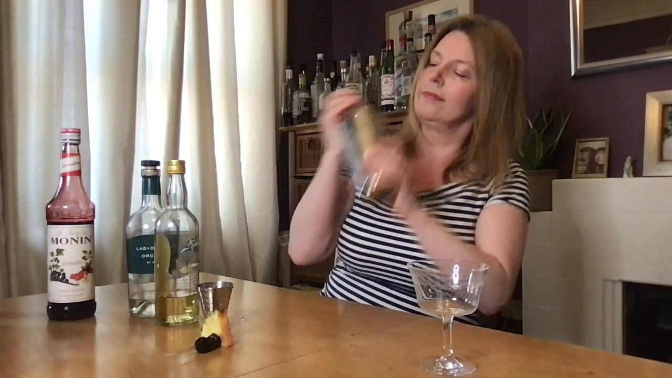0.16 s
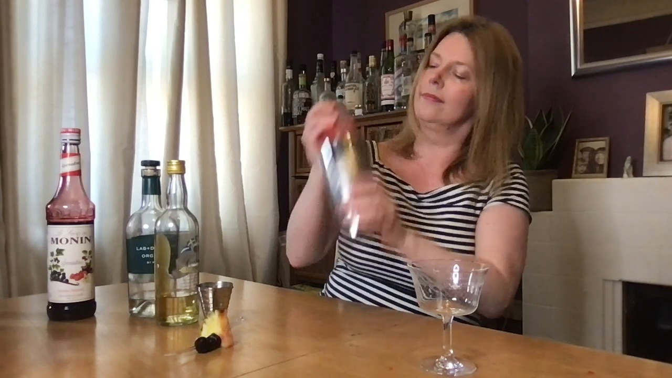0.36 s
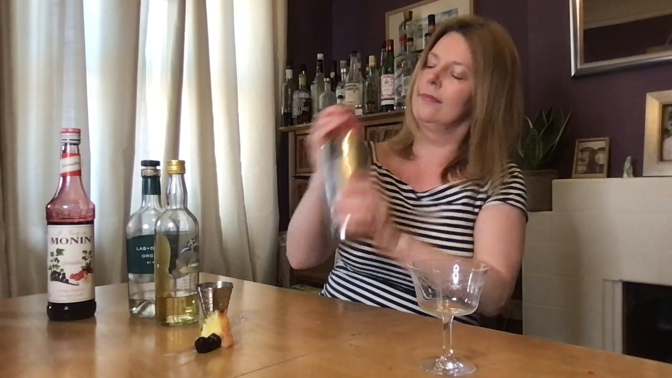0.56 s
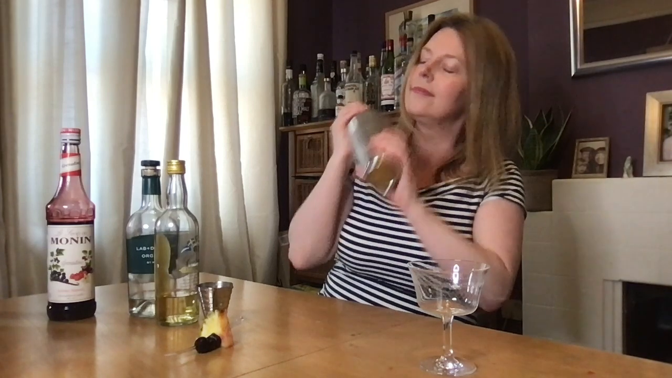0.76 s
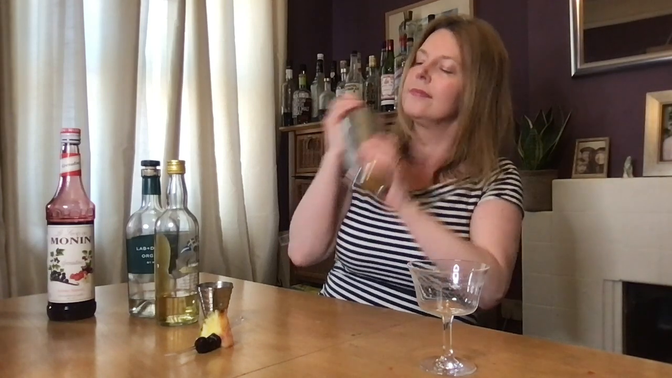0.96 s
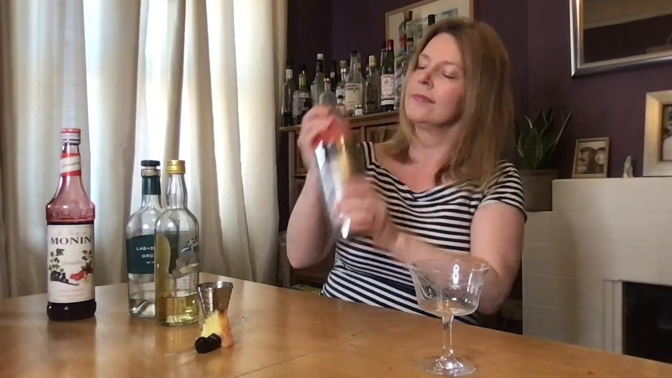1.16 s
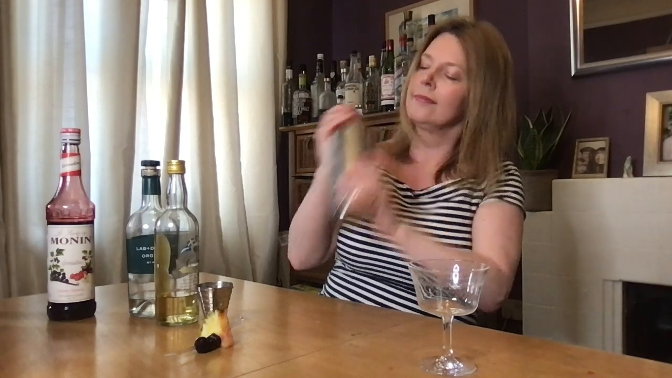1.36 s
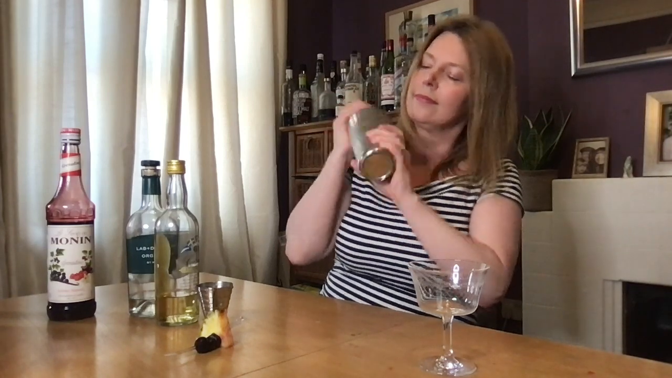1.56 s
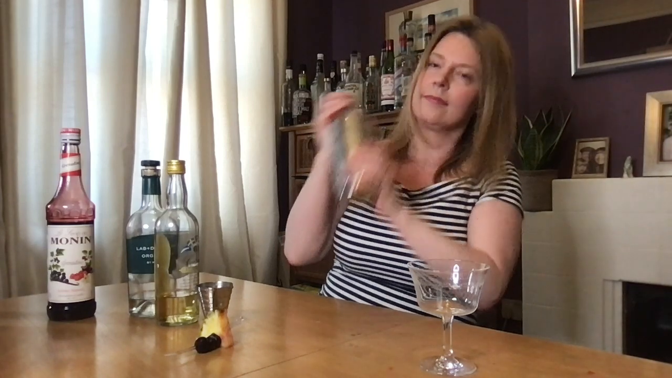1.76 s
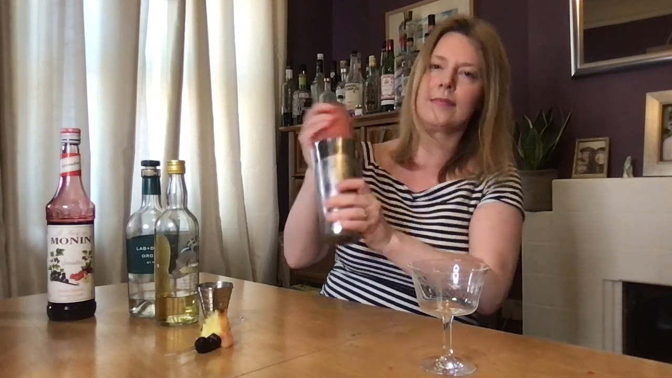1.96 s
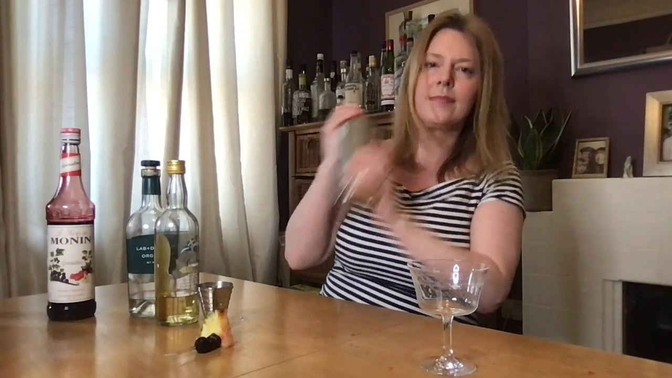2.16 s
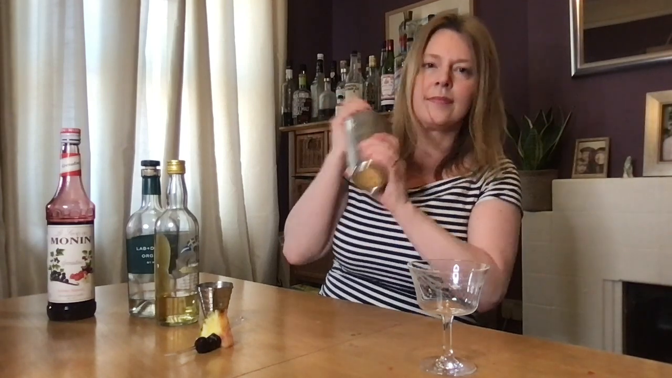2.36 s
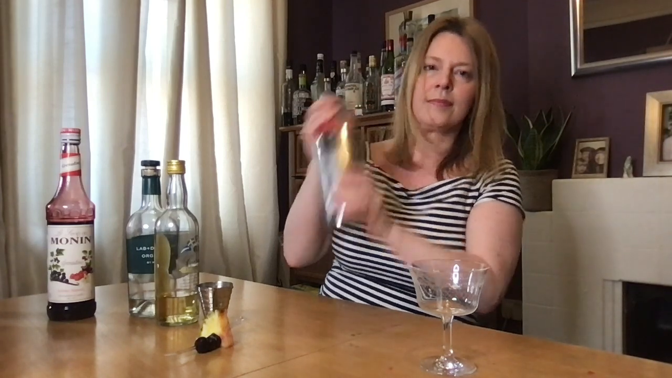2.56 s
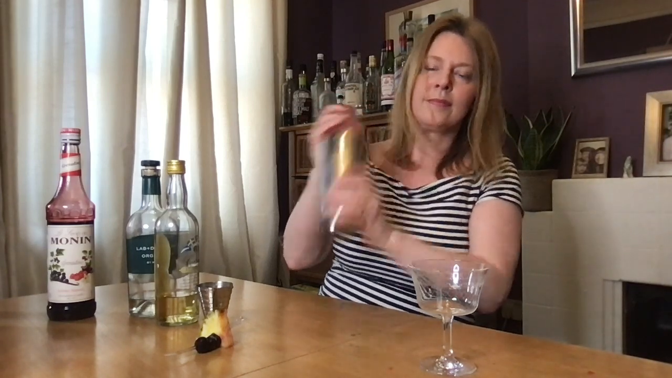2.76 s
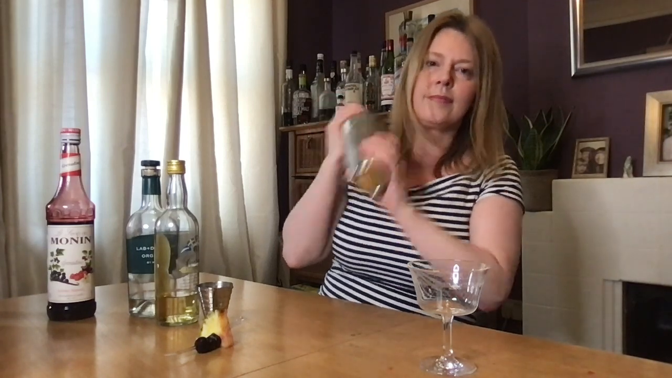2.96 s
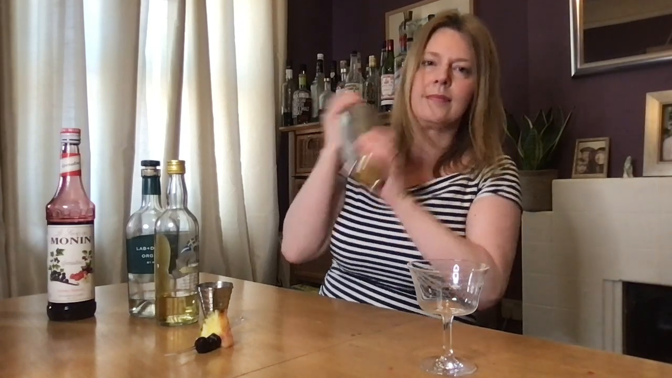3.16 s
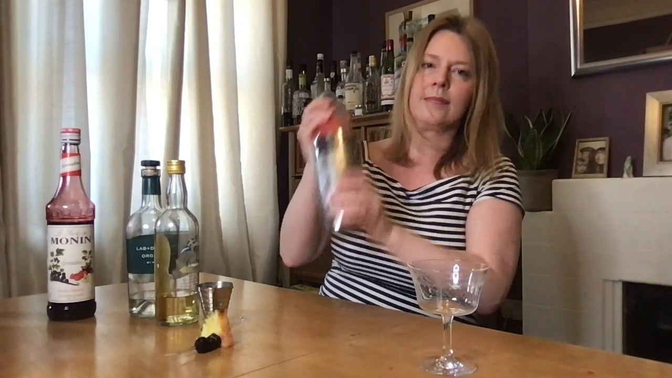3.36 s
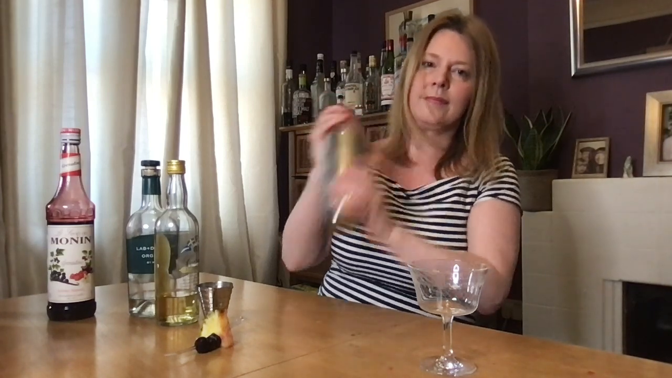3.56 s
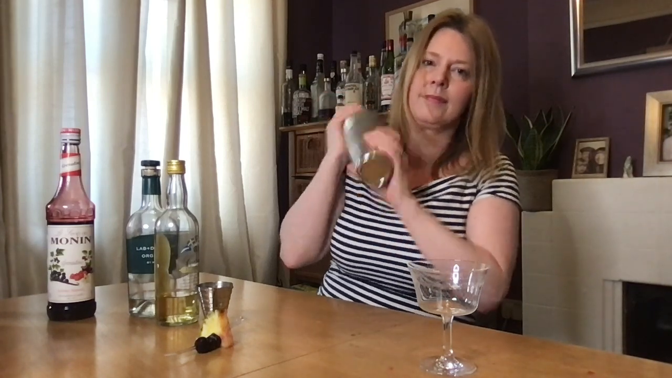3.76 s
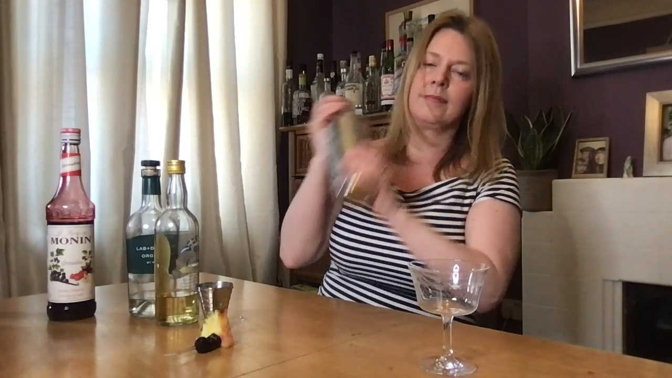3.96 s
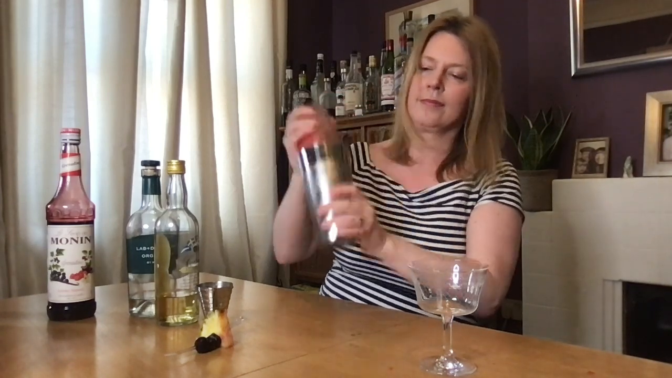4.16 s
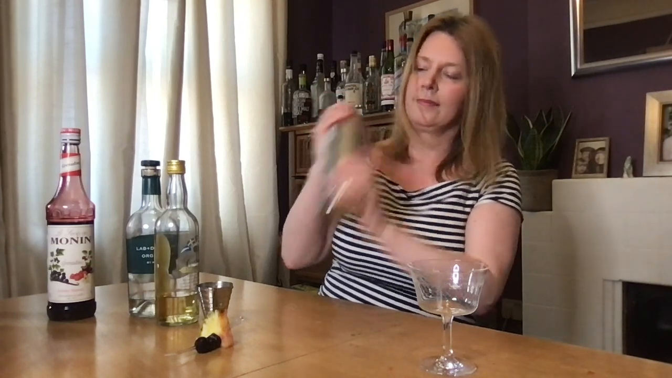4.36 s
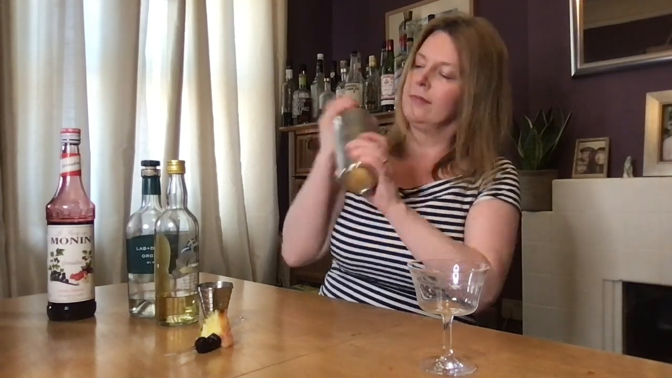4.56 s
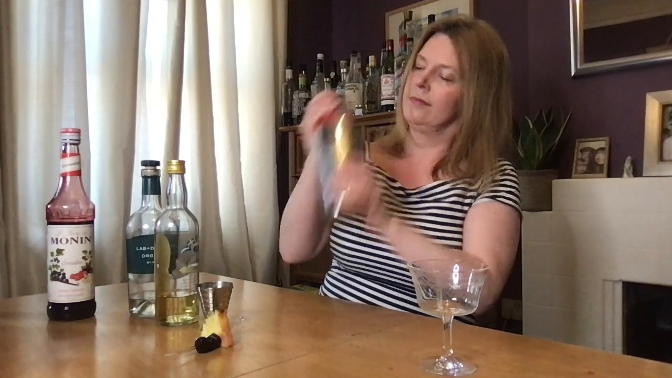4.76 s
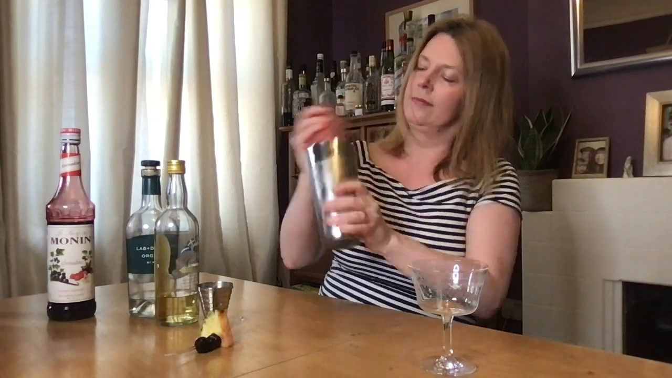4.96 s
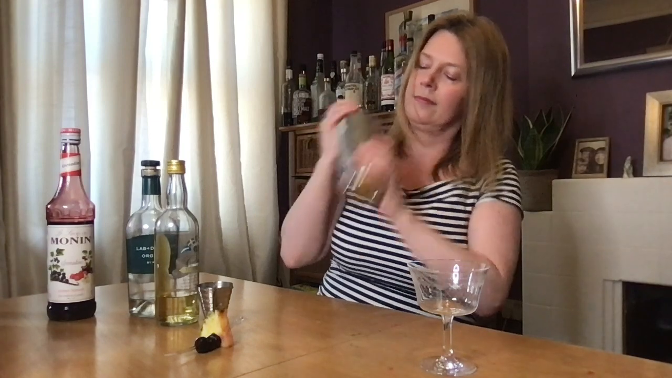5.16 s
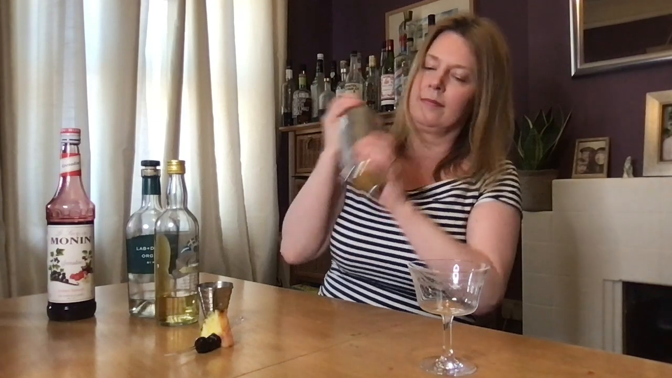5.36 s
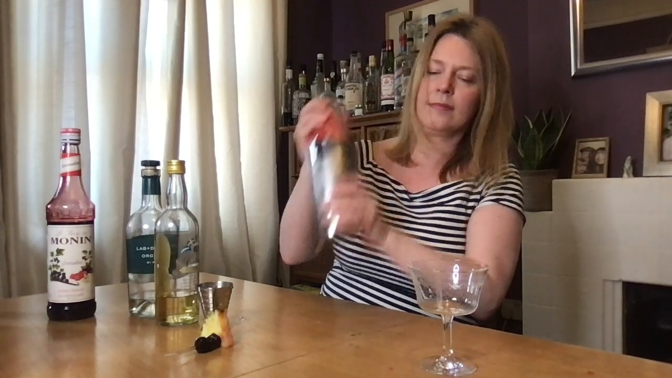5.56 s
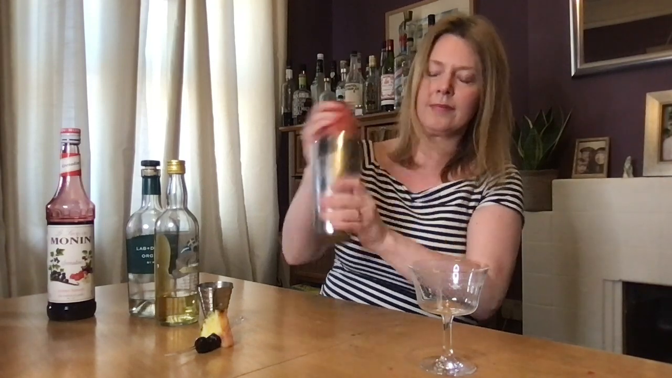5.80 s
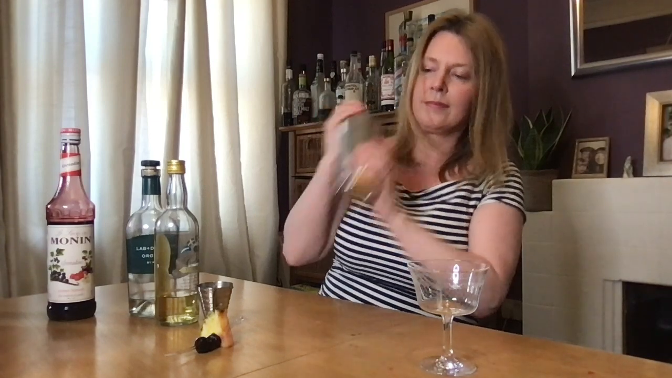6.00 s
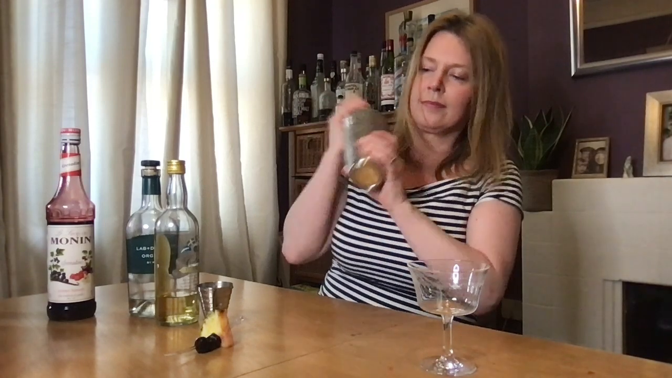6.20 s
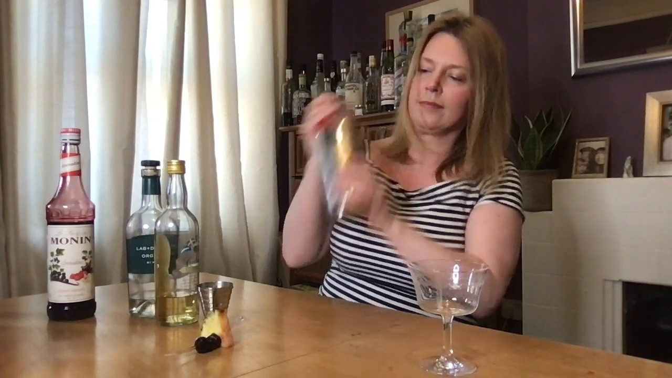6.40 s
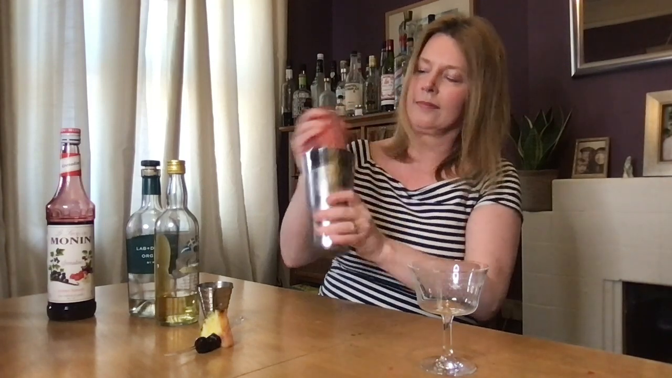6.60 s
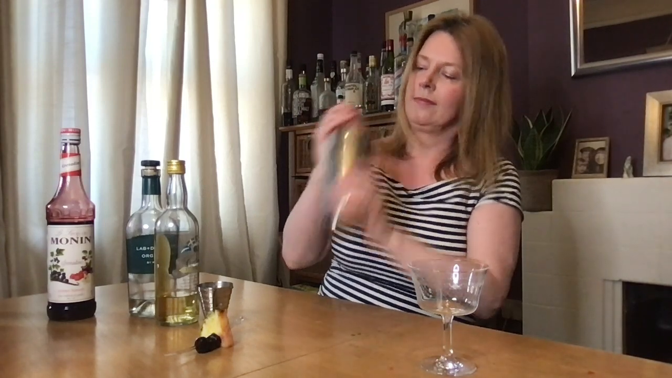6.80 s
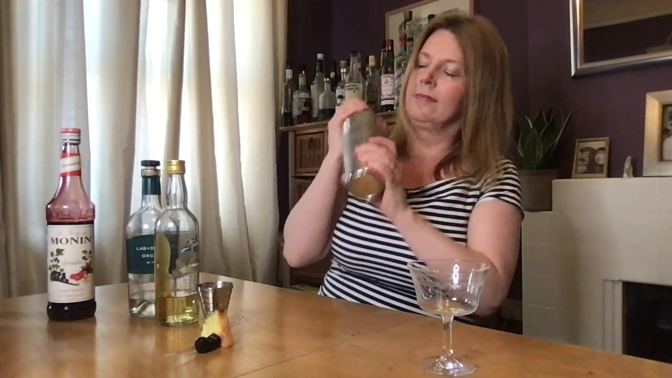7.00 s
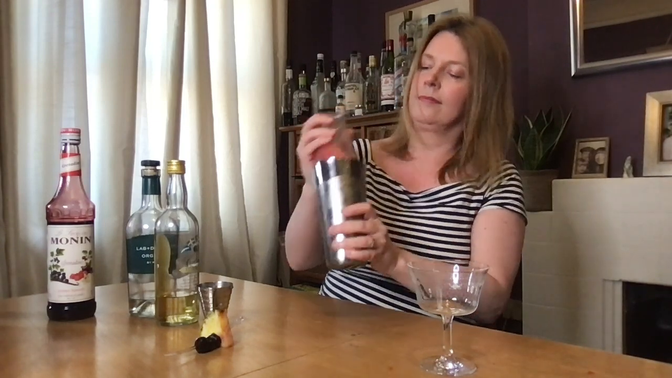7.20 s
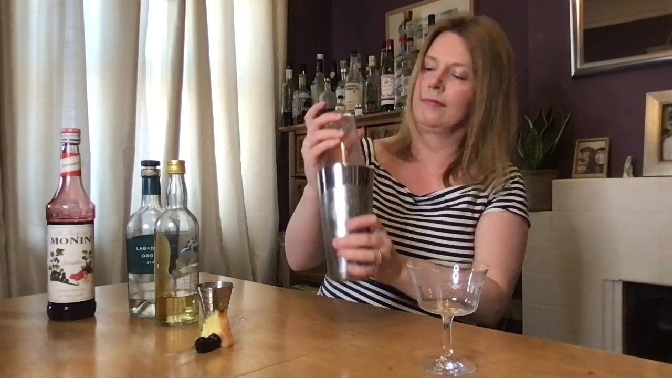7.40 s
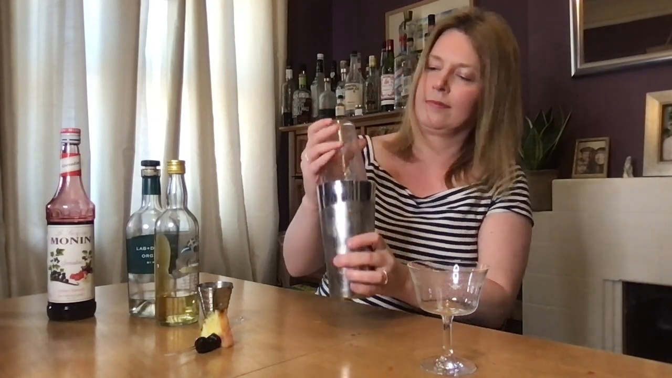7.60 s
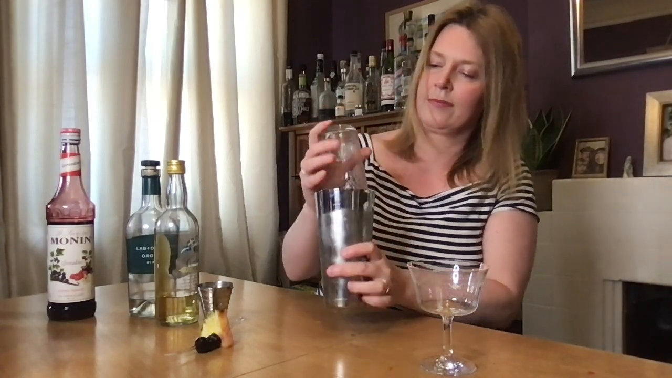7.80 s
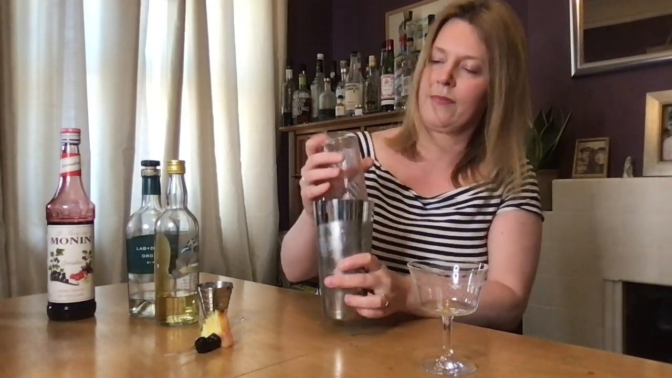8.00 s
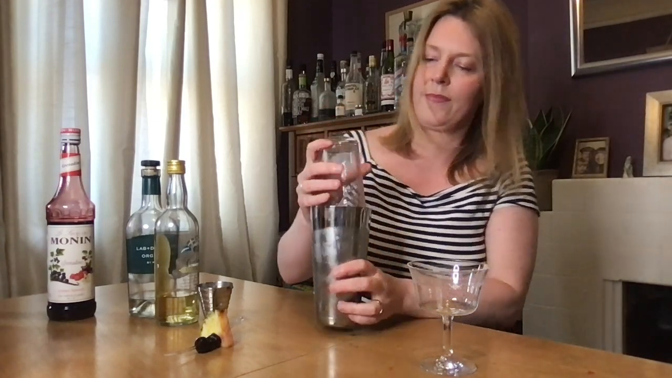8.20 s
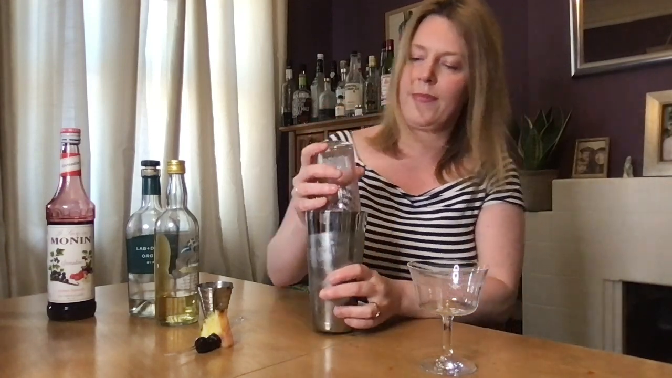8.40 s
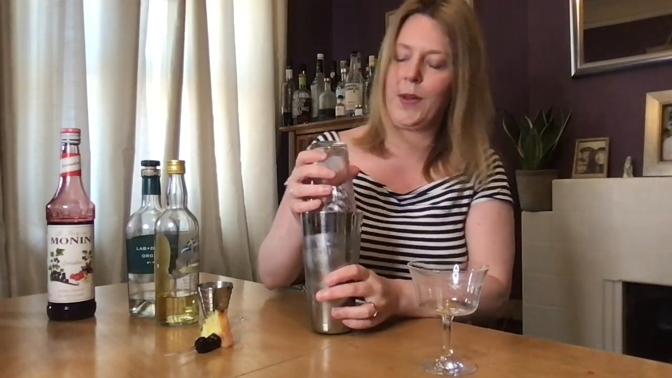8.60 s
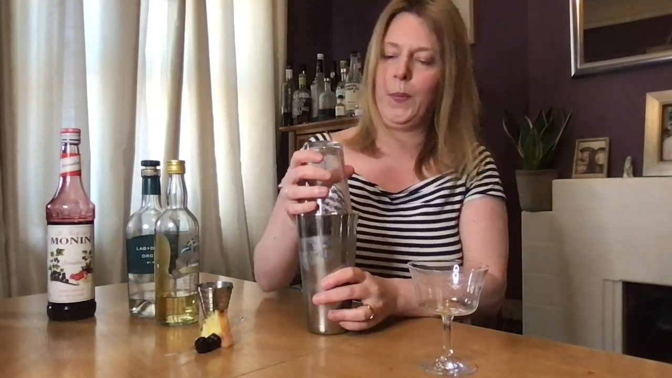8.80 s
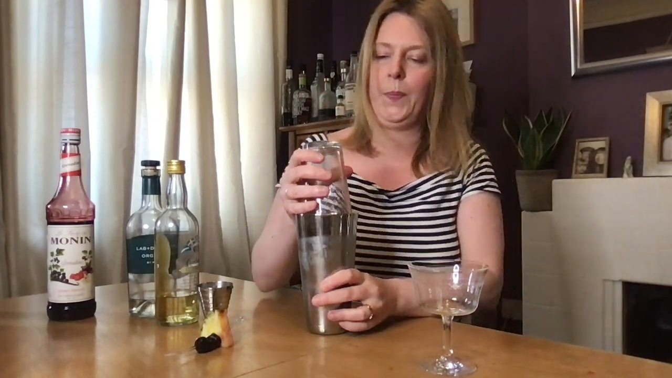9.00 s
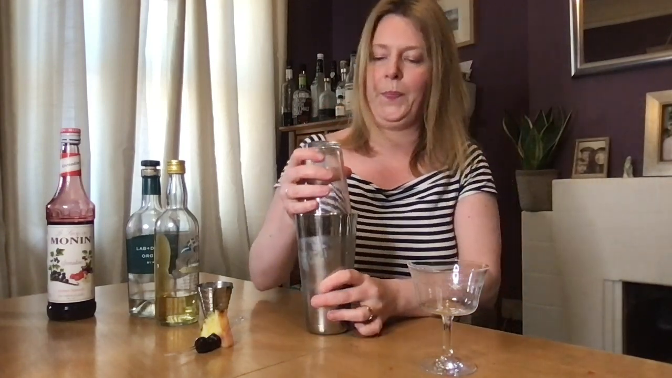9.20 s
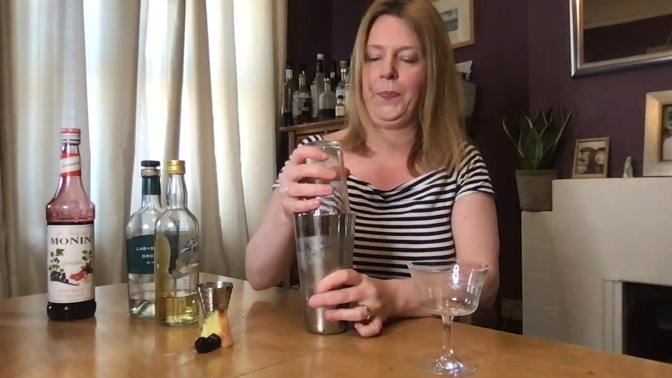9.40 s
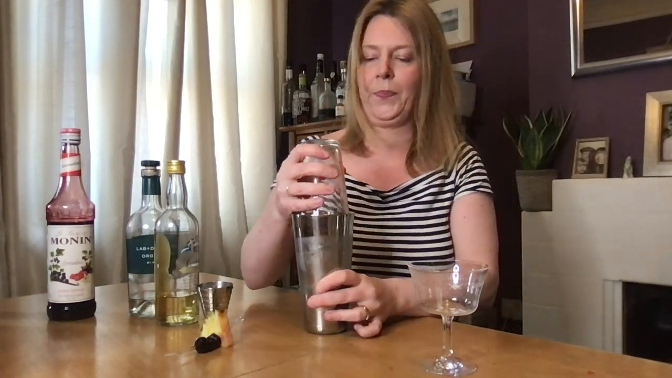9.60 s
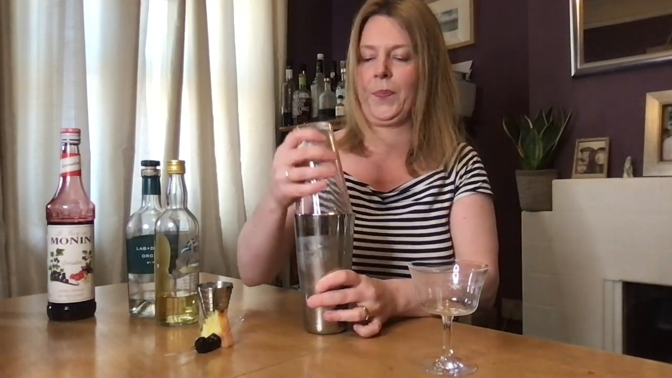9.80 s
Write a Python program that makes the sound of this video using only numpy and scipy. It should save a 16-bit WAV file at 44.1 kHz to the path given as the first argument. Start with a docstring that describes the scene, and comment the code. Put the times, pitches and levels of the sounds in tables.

```python
"""Sharp cracks, short metallic rings and icy clatter, then soft knocks, a squeak and a faint glassy ring.
Ice cubes and liquor are shaken in a steel tin capped with a mixing glass, in a furnished room: cubes are
noise bursts and damped tones, the tin a set of struck modes, small ice a stream of pings over a wash.
The shaking stops; the tin is set on a wooden table (struck modes) and rocked, and the glass is worked
loose (gliding tones, grains of friction, rim modes). Room tone and a low rumble lie underneath."""
import sys
import numpy as np
from scipy import signal
from scipy.io import wavfile

SR = 44100
rng = np.random.default_rng(int(sys.argv[2]) if len(sys.argv) > 2 else 0)


def master(y):
    """Save y as 16-bit WAV."""
    cut = np.clip(np.atleast_2d(y).T, -1, 1)
    pcm = np.round(cut * 32767)  # scale
    wavfile.write(sys.argv[1], SR, pcm.astype(np.int16))


N = 434385

# Cubes cracking on the wall. Each row: time in seconds, relative level in dB, thud in dB and
# splinter in dB relative to the body, body pitch in Hz.
CRACKS = [(0.0225, -29.5, -26.5, -4, 4000), (0.186, -26, -9, -43, 3810), (0.292, -30.5, -38, -23.5, 2620),
          (0.394, -30, -6, -5, 2850), (0.5339, -28.5, -5, -3, 2160), (0.6743, -37, 3, 5, 1940),
          (0.7175, -15, -19.5, -17.5, 1960), (0.833, -28.5, -9, -3, 2490), (0.876, -36.5, 2, -12, 3020),
          (0.935, -29.5, 3, -25, 3000), (0.991, -26, -37, -16, 2080), (1.0666, -20, -11.5, -16, 2370),
          (1.108, -25.5, -26, -18, 3620), (1.177, -32.5, -36, -3, 3930), (1.2383, -29.5, 0.5, -5.5, 3740),
          (1.4149, -22, -54, -9, 3770), (1.5326, -21.5, -11, -8, 1880), (1.6854, -17.5, -42, -19.5, 3500),
          (1.7916, -23, -19, -38, 2190), (1.9055, -22, -10.5, -6, 1920), (1.9642, -20, -98, -45.5, 4840),
          (2.1111, -32, -0.5, -38, 4000), (2.157, -27.5, -25, -15.5, 2230),
          (2.244, -20.5, -16.5, -12.5, 3530), (2.311, -26.5, -2.5, -5, 3120),
          (2.602, -27, -10.5, -7.5, 1920), (2.745, -26, -11, -9, 3700), (2.834, -28.5, -1, 3.5, 2540),
          (3.0038, -23.5, -6.5, -19.5, 1770), (3.0741, -27, -17, -7, 2010), (3.1564, -24, -9, -30, 1980),
          (3.3152, -28, -5.5, -28, 3340), (3.4113, -32, 5, -18, 3650), (3.541, -24, -28, -18.5, 2700),
          (3.602, -19.5, -71.5, -15, 3730), (3.7073, -30, 2.5, -6, 3600), (3.84, -28, -4, -8, 3020),
          (3.947, -23.5, -11.5, -25, 1940), (4.194, -24, -34, -27, 4650), (4.2386, -30.5, 3, -2.5, 3220),
          (4.277, -23.5, -25, -33, 1880), (4.398, -37, -1.5, 5.5, 4770), (4.6215, -21.5, -32, -14.5, 3640),
          (4.82, -32.5, 6.5, -6, 3040), (4.888, -22, -32, -36, 1760), (4.9642, -26, -19, -13, 2200),
          (5.0938, -22.5, -8, -12.5, 1980), (5.1792, -29.5, -14, -30, 1870),
          (5.222, -27.5, -10, -7.5, 2290), (5.2938, -25.5, -10.5, -15.5, 2550),
          (5.4311, -39, -10, -2.5, 3900), (5.492, -23.5, -22, -12, 2500), (5.607, -26.5, -13, -12.5, 3190),
          (5.646, -14.5, -25, -27.5, 2200), (5.8517, -22, -77, -8.5, 4500), (6.015, -29.5, -10, -3, 4060),
          (6.2933, -26.5, -14, -4.5, 2420), (6.355, -28, -37, -4, 2440), (6.63, -25.5, -20, -13, 2490),
          (6.6816, -32.5, -16.5, -32, 3070), (6.79, -36.5, -1, -1, 3600), (6.8954, -21.5, -51, -9.5, 3590),
          (7.0224, -31, -11, -5, 1960), (7.1431, -25, -29, -17, 2330), (7.191, -35, -43.5, -12, 3180),
          (7.4213, -43, -7.5, -10, 3780), (7.5186, -39, -8.5, -15, 3310), (7.5817, -53, -40, 2, 3800),
          (7.779, -49, -5, -30, 2050)]
# Decay of the crack noise. Each row: frequency in Hz, T60 in seconds.
CRACK_T60 = [(200, 0.18), (1000, 0.19), (4000, 0.25), (14000, 0.1)]
THUD_HZ, SPLINTER_HZ = 550, 9000
BODY_RING_DB, BODY_RING_T60_S = -24, 0.13
BODY_SPREAD = 0.07   # log-frequency spread of a cube's tones

# Cubes landing flat, ringing the tin. Each row: time in seconds, relative level in dB,
# free ring in seconds before liquor stifles it.
CLANGS = [(0.1657, -32.5, 0.033), (0.2283, -30, 0.028), (0.4205, -20, 0.02), (0.448, -31.5, 0.014),
          (0.4829, -19, 0.016), (0.6, -33, 0.042), (0.675, -25, 0.014), (0.7168, -19, 0.0047),
          (1.1243, -29, 0.026), (1.255, -19.5, 0.0064), (1.7773, -18, 0.0025), (1.789, -24.5, 0.0084),
          (2.08, -23.5, 0.0039), (2.319, -25.5, 0.009), (2.612, -27.5, 0.0088), (2.6606, -23.5, 0.011),
          (2.8628, -30, 0.02), (2.876, -29.5, 0.023), (3.135, -32, 0.044), (3.1825, -25.5, 0.017),
          (3.412, -25.5, 0.0065), (3.709, -25, 0.0062), (3.84, -32, 0.0114), (3.9448, -36, 0.0091),
          (3.986, -31.5, 0.025), (4.241, -25.5, 0.018), (4.5104, -33.5, 0.06), (4.687, -34, 0.034),
          (4.8207, -25, 0.011), (5.0496, -26.5, 0.0055), (5.0769, -23, 0.0047), (5.133, -35, 0.022),
          (5.3336, -31.5, 0.032), (5.608, -24, 0.022), (5.644, -18, 0.0042), (5.685, -30, 0.016),
          (5.8933, -28, 0.016), (6.1805, -26.5, 0.042), (6.201, -27, 0.015), (6.293, -28, 0.0074),
          (6.434, -23, 0.021), (6.445, -24.5, 0.029), (6.6833, -26.5, 0.022), (6.714, -35, 0.014),
          (6.974, -23, 0.0056), (7.1896, -21, 0.01), (7.2684, -22.5, 0.0069), (7.478, -42, 0.019),
          (7.7804, -49, 0.0035), (8.256, -60, 0.008)]
# Tin modes. Each row: nominal frequency in Hz, relative level in dB, T60 in seconds when struck.
TIN_MODES = [(1668, 2.5, 0.35), (1790, -16.5, 0.093), (1880, -12, 0.058), (1600, -16, 0.051),
             (1636, -14, 0.07), (3190, -20, 0.11)]
BLOOM_S, CHOKE_TAKES_S, CHOKE_DB = 0.0042, 0.0021, -10.5   # liquor falls back on the wall
STIFLED_DB_PER_S = 380   # extra loss under liquor
CLANG_DETUNE = .006   # fractional spread; grip and liquor shift the ring from blow to blow

# Turns of the wrist throwing the small ice to the far end. Each row: start in seconds,
# relative level in dB before the sag, tumble length in seconds.
THROWS = [(-0.03, -41, 0.088), (.06, -38, 0.15), (.27, -40, 0.068), (.385, -38.5, 0.52), (.675, -38, 0.064),
          (.82, -36, 0.2), (1.06, -39.5, 0.3), (1.4, -42, 0.26), (1.53, -38.5, 0.32), (1.75, -36, 0.083),
          (1.89, -39.5, 0.17), (2.08, -37.5, 0.21), (2.24, -45, 0.12), (2.42, -37, 0.25),
          (2.6, -36.5, 0.071), (2.83, -35, 0.078), (2.99, -39.5, 0.19), (3.12, -36, .07),
          (3.29, -37, 0.038), (3.39, -38.5, 0.11), (3.53, -39, 0.13), (3.7, -41.5, 0.24),
          (3.93, -38.5, 0.051), (4.07, -33, 0.013), (4.19, -45, 0.17), (4.39, -40.5, 0.2),
          (4.5, -30.5, 0.035), (4.61, -41.5, 0.18), (4.805, -41, 0.22), (5.04, -38, 0.092),
          (5.17, -41.5, 0.2), (5.46, -41, 0.11), (5.6, -36.5, 0.28), (5.8, -38, .05), (5.86, -30.5, 0.032),
          (5.99, -34.5, 0.041), (6.09, -38.5, 0.017), (6.15, -38.5, 0.2), (6.28, -38.5, 0.13),
          (6.425, -36, 0.064), (6.57, -36, 0.14), (6.78, -43, 0.069), (6.88, -44.5, 0.11),
          (7.0, -40.5, 0.099), (7.14, -44, 0.16), (7.3, -45, 0.039), (7.5, -50.5, .07), (7.77, -71, .04),
          (7.85, -78, 0.67)]
THROW_RISE_S, TUMBLE_SAG_DB_PER_S, SETTLE_DB_PER_S = 0.018, 19, 167.5
# Colour of the clatter. Each row: frequency in Hz, relative level in dB.
CLATTER_COLOUR = [(71, -78.5), (120, -32.5), (427, -9), (800, -3), (1000, -1.5), (1260, -4.5), (1650, 4),
                  (2200, -1), (3900, 1.5), (5630, -3.5), (16000, -25.5)]
CHIP_CYCLES = 20   # periods in an ice chip's T60

# Chips ticking on bare steel. Each row: time in seconds, relative level in dB.
TICKS = [(0.4284, -24), (1.7513, -24), (2.8858, -28), (3.1288, -27), (3.652, -28.5), (4.52, -32),
         (4.8294, -22.5), (5.0133, -27), (5.071, -29), (5.5857, -29), (6.275, -29), (7.2396, -38),
         (7.345, -45), (7.3967, -44), (7.4779, -55), (7.5558, -56), (7.8128, -70), (8.1242, -70)]
TICK_T60_S, TICK_LOW_HZ, TICK_HIGH_HZ = .012, 2600.0, 9000.0

# Cubes landing softly on the wetted wall. Each row: time in seconds, relative level in dB.
THUMPS = [(0.5999, -45), (1.1233, -36.5), (1.7859, -32), (2.2029, -35), (2.5537, -40), (2.7768, -37.5),
          (2.8689, -34), (3.7198, -37), (5.8913, -33.5), (6.6987, -34.5), (8.255, -60)]
# Low modes of the tin under liquor. Each row: frequency in Hz, relative level in dB, T60 in seconds.
WETTED_WALL_MODES = [(929, 4, 0.058), (637.6, -6, 0.03), (745, -6, 0.17)]

# Soft bumps: two during the shaking, later the tin base on the table. Each row: time in seconds,
# relative level in dB, hardness (treble share) in dB, weight (bass share) in dB.
KNOCKS = [(3.71, -58, -13, -16), (4.819, -48, -27, -17), (8.432, -27.5, -27, 2), (8.79, -54, -48.5, 8),
          (8.907, -62.5, -46, 19), (9.083, -66, -43, 21), (9.216, -52.5, -29.5, 14.5),
          (9.682, -33.5, -24, -10)]
# Modes of table and tin base. Each row: frequency in Hz, relative level in dB,
# T60 in seconds when knocked.
TABLE_MODES = [(65.9, -8.5, 0.25), (130.5, -10, 0.3), (195.3, 0.5, 0.11), (244.5, -4.5, 0.073),
               (304, -7, 0.12), (346, -12, 0.121), (416.6, -8, 0.1), (600, -13, 0.056), (920, -7.5, 0.029),
               (1504, -7.5, 0.043), (3220, -7, 0.094), (5450, -1, 0.032)]
# Low murmurs: two dull ones during the shaking, later the tin base scuffing the table.
# Each row: start in seconds, level in dB before the sag, length in seconds.
MURMURS = [(3.72, -56, 0.1), (3.96, -59, 0.065), (8.785, -59, 0.039), (9.07, -76.5, 0.047),
           (9.21, -67, 0.24), (9.42, -67.5, 0.17), (9.58, -65.5, 0.18)]

# Short smooth tones: a low hum during the shaking, later the wet seal. Each row: start in seconds,
# length in seconds, first pitch in Hz, last pitch in Hz, peak level in dB.
SQUEAKS = [(3.805, 0.037, 151, 162, -48.5), (8.966, 0.048, 406, 490, -59.5), (9.162, .02, 1010, 1120, -70),
           (9.183, 0.019, 1590, 1710, -70), (9.583, 0.068, 277, 253, -61)]
# Hands rubbing and twisting the glass. Each row: start in seconds, level in dB before the sag,
# length in seconds.
RUBS = [(9.2, -74.5, 0.067), (9.38, -78, 0.14), (9.52, -69, 0.11)]
# Colour of the rubbing. Each row: frequency in Hz, relative level in dB.
RUB_COLOUR = [(410, -17.5), (700, 4.5), (1100, -10), (2000, -1), (2600, -6), (3700, 2.5), (4500, -23),
              (7000, -11.5), (9000, -32), (16000, -50)]
# The freed glass ringing. Each row: start in seconds, level in dB before the sag, length in seconds.
GLASS_RINGS = [(9.68, -69.5, 0.092)]
# Rim modes of the glass. Each row: frequency in Hz, relative level in dB, width in Hz (T60 = 1 / width).
RIM_MODES = [(1980, 3.5, 22), (4266, -2.5, 21), (7200, -1.5, 43)]

# Decay of the room. Each row: frequency in Hz, T60 in seconds.
ROOM_T60 = [(100, 0.26), (1000, 0.32), (8000, 0.41)]
ROOM_DB = -7.5
# Colour of the room tone. Each row: frequency in Hz, relative level in dB.
ROOM_TONE_COLOUR = [(15, -32), (25, 4.5), (99, -6.5), (157, -11.5), (249, -4.5), (545, -14.5), (2160, -21),
                    (2550, -25), (16000, -32.5)]
ROOM_TONE_DB = -80.5
# Distant rumble. Each row: time in seconds, level in dB.
RUMBLE = [(0, -78), (.68, -78.5), (1.2, -61.5), (2.1, -85.5), (2.96, -71.5), (3.89, -76), (5.68, -88.5),
          (7.0, -100.5), (8.4, -78.5), (9.85, -68)]
STOP_EDGE_HZ = 15900 * 1.03


def from_db(db):
    """Decibels to gain."""
    return 10 ** (np.asarray(db) / 20)


def rms_one(x):
    """Scale to rms 1."""
    return x / np.sqrt(np.mean(x ** 2) + 1e-20)


def in_time(rows, column):
    """One curve column in dB at every sample; -150 outside its span."""
    rows = np.array(rows)
    return np.interp(np.arange(N) / SR, rows[:, 0], rows[:, column], left=-150, right=-150)


def at_hz(points, hz):
    """A curve read on a log-frequency axis."""
    points = np.array(points)
    return np.interp(np.log(hz), np.log(points[:, 0]), points[:, 1])


def filtered(x, order, hz, kind="low"):
    """Butterworth filter."""
    return signal.sosfilt(signal.butter(order, hz, kind, fs=SR, output="sos"), x)


def train(times_s, sizes):
    """One-sample clicks of given sizes."""
    out = np.full(N, 1e-18)   # tiny floor keeps the filters fast
    at = np.round(np.array(times_s) * SR).astype(int)
    out[np.clip(at, 0, N - 1)] = sizes
    return out


def ring(clicks, hz, t60_s):
    """Two-pole resonator: a unit click starts a decaying sine of initial height near 1."""
    r = from_db(-60 / (t60_s * SR))
    w = 2 * np.pi * hz / SR
    return signal.lfilter([0, np.sin(w)], [1, -2 * r * np.cos(w), r * r], clicks)


def dying(clicks, t60_s):
    """Each click starts an envelope that falls 60 dB in t60_s."""
    decay = from_db(-60 / (max(t60_s, 1e-3) * SR))
    return signal.lfilter([1], [1, -decay], clicks)


def bands(lowest_hz):
    """Half-octave band filters with centres; alternating signs join neighbours without a notch."""
    edges_hz = lowest_hz * 2 ** np.arange(0, np.log2(17000 / lowest_hz), .5)
    for k, low_hz in enumerate(edges_hz):
        high_hz = min(low_hz * np.sqrt(2), .45 * SR)
        sos = signal.butter(2, [low_hz, high_hz], "band", fs=SR, output="sos")
        sos[0, :3] *= (-1) ** k
        yield low_hz * 2 ** .25, sos


def drift(rate_hz):
    """Slow chance: straight lines between normal random knots, at most 40 per second."""
    knots = rng.standard_normal(int(N / SR * 40) + 9)
    return np.interp(np.arange(N) * min(rate_hz, 40) / SR, np.arange(len(knots)), knots)


def grains(per_s, spread_db):
    """Random clicks of uneven size, the loudest capped; rms 1."""
    sizes = from_db(spread_db * np.minimum(rng.exponential(1, N), 3.5))
    signs = rng.choice([-1, 1], N)
    return rms_one(sizes * signs * (rng.random(N) < per_s / SR))


def coloured(x, spectrum, patchy_db=0):
    """A source through the band bank, each band optionally drifting in level; rms 1."""
    out = np.zeros(N)
    for hz, sos in bands(22):
        level_db = at_hz(spectrum, hz)
        if patchy_db:
            level_db = level_db + patchy_db * drift(25.0)
        out += from_db(level_db) * signal.sosfilt(sos, x)
    return rms_one(out)


def swells(rows, rise_s, sag_db_per_s, fall_db_per_s):
    """Level in dB of overlapping gestures: each rises 20 dB in rise_s, sags, then falls faster."""
    level_db = np.full(N // 32 + 2, -150.)
    t = np.arange(len(level_db)) * 32 / SR
    for start, db, length in rows:
        since = t - start
        rise_db = -20 * np.clip(1 - since / rise_s, 0, 9)
        sag_db = -sag_db_per_s * np.maximum(since, 0)
        fall_db = -fall_db_per_s * np.maximum(since - length, 0)
        level_db = np.maximum(level_db, db + rise_db + sag_db + fall_db)
    return np.interp(np.arange(N) / SR, t, level_db)


def cube_cracks():
    """A crack is a tick and a noise burst shaped around its body pitch; each band dies at its own rate."""
    rows = np.array(CRACKS)
    times_s, level_db, body_hz = rows[:, 0], rows[:, 1], rows[:, 4]
    chance = rng.normal(0, 1, (len(rows), 16))
    white = rng.standard_normal((2, N))
    out = np.zeros(N)
    for k, (hz, sos) in enumerate(bands(150)):
        zone_db = [np.interp(np.log(hz), np.log([THUD_HZ, body, SPLINTER_HZ]), [thud, 0, splinter])
                   for thud, splinter, body in rows[:, 2:]]
        hump_db = 1.9 * np.exp(-(np.log2(hz / body_hz) / 0.36) ** 2)
        # little bass from the small tin, little extreme treble
        edge_db = -13.0 * max(np.log2(650.0 / hz), 0) - 8.0 * max(np.log2(hz / SPLINTER_HZ), 0)
        band_db = level_db + zone_db + hump_db + edge_db - 20.0 + 2.0 * chance[:, k]
        clicks = train(times_s, from_db(band_db))
        tick = 38 * clicks
        snap = 4 * dying(clicks, .009)   # loud first few ms
        tail = 4.22 * dying(clicks, at_hz(CRACK_T60, hz))
        burst = tick + (snap + tail) * white[k % 2]
        out += signal.sosfilt(sos, burst) * np.sqrt(4000 / hz)   # offsets the wider high bands
    return out


def cube_rings():
    """Each cube rings briefly: a damped cluster of four tones around its body pitch."""
    out = np.zeros(N + SR)
    t = np.arange(SR // 10) / SR
    detunes = np.exp(BODY_SPREAD * rng.standard_normal((len(CRACKS), 4, 1)))
    for (s, db, _, _, hz), detune in zip(CRACKS, detunes):
        cluster = np.sin(2 * np.pi * hz * detune * t).sum(axis=0)
        at = int(s * SR)
        out[at:at + len(t)] += from_db(db + BODY_RING_DB - 60 * t / BODY_RING_T60_S) * cluster
    return out[:N]


def struck_tin():
    """Flat blows excite the tin modes; the ring blooms, then liquor stifles it."""
    chance = rng.normal(0, 1, (len(CLANGS), len(TIN_MODES) + 1))
    hz, level_db, t60_s = np.transpose(TIN_MODES)[:, :, None]
    varies = hz[:, 0] != hz[0, 0]   # the first mode keeps its level
    out = np.zeros(N + SR)
    t = np.arange(SR // 5) / SR
    for (s, db, free_s), (detune, *luck) in zip(CLANGS, chance):
        tones = np.sin(2 * np.pi * hz * (1 + CLANG_DETUNE * detune) * t)
        modes = from_db(level_db - 60 * t / t60_s) * tones
        bloom = np.clip(t / BLOOM_S, 0, 1)
        choke_db = CHOKE_DB * np.clip((t - free_s) / CHOKE_TAKES_S + 1, 0, 1)
        stifle_db = -STIFLED_DB_PER_S * np.maximum(t - free_s, 0)
        mode_gains = from_db(4 * np.array(luck) * varies)
        at = int(s * SR)
        out[at:at + len(t)] += bloom * from_db(db + choke_db + stifle_db) * (mode_gains @ modes)
    return out[:N]


def rattled_tin():
    """Small ice drives the tin modes as a stream of grains, each mode damped twice as fast; rms 1."""
    small = grains(per_s=350, spread_db=5.0)
    out = np.zeros(N)
    for k, (hz, level_db, t60_s) in enumerate(TIN_MODES):
        out += from_db(level_db) * ring(np.roll(small, 997 * k), hz, t60_s / 2)
    return rms_one(out)


def tin_ring():
    """Flat blows and small ice both ring the tin; liquor washing over the wall makes it flutter."""
    flutter = from_db(3.5 * drift(40))
    return flutter * (from_db(-3.0) * struck_tin() + from_db(small_ice_db() - 10.5) * rattled_tin())


def small_ice_db():
    """How hard the small ice tumbles, in dB."""
    return swells(THROWS, THROW_RISE_S, TUMBLE_SAG_DB_PER_S, SETTLE_DB_PER_S)


def clatter():
    """Ice chips ping at nine pitches over a wash of liquor noise; harder shaking is brighter."""
    knocks = grains(per_s=220, spread_db=3.6)
    pitches_hz = np.geomspace(1100, 13000, 9)
    dealt = rng.integers(0, len(pitches_hz), N)
    pings = np.zeros(N)
    for k, hz in enumerate(pitches_hz):
        pings += np.sqrt(hz) * ring(knocks * (dealt == k) + 1e-18, hz, CHIP_CYCLES / hz)
    sizzle = dying(np.abs(knocks), 0.007)
    source = 0.6 * rms_one(pings) + (rms_one(sizzle) + 0.6) * rng.standard_normal(N)
    wash = coloured(source, CLATTER_COLOUR, patchy_db=4.5)
    treble = filtered(wash, 2, 7000.0, "high")
    level_db = small_ice_db()
    brightness = from_db(np.clip(0.44 * (level_db + 36.0), -20, 6))
    return from_db(level_db - 3.0) * (wash + (brightness - 1) * treble)


def ticks():
    """A bare click with a wisp of noise, band-passed to treble."""
    times_s, level_db = np.transpose(TICKS)
    clicks = train(times_s, from_db(level_db))
    burst = 3 * clicks + 0.4 * dying(clicks, TICK_T60_S) * rng.standard_normal(N)
    return filtered(burst, 1, [TICK_LOW_HZ, TICK_HIGH_HZ], "band")


def thumps():
    """Soft landings, and the thud of every crack, ring the low modes of the wetted wall."""
    crack_thuds = [(s, db + thud - 14.5) for s, db, thud, _, _ in CRACKS]
    times_s, db = np.transpose(list(THUMPS) + crack_thuds)
    luck_db = 3 * rng.normal(0, 1, (len(times_s), len(WETTED_WALL_MODES)))
    modes = np.zeros(N)
    for k, (hz, level_db, t60_s) in enumerate(WETTED_WALL_MODES):
        modes += ring(train(times_s, from_db(db + level_db + luck_db[:, k])), hz, t60_s)
    push = filtered(train(times_s, from_db(db)), 2, [350, 1800], "band")
    return from_db(-7.0) * modes + from_db(9.5) * push


def table():
    """Contacts drive the modes of table and tin base; harder ones add more noisy rattle."""
    times_s, db, hardness_db, bass_db = np.transpose(KNOCKS)
    chance = rng.normal(0, 1, (len(KNOCKS), len(TABLE_MODES)))
    modes = np.zeros(N)
    for k, (hz, level_db, t60_s) in enumerate(TABLE_MODES):
        share_db = bass_db * (hz < 100) + (hardness_db + 24) * (hz > 500)
        late_s = .6 / hz   # low bending waves travel slowly and arrive later
        sizes = (-1) ** k * from_db(db + level_db + share_db + 1.5 * chance[:, k])
        modes += ring(train(times_s + late_s, sizes), hz, t60_s)
    soft = filtered(modes, 2, 900.0)
    hard_clicks = train(times_s, from_db(db + hardness_db + 15.0))
    rattle = dying(hard_clicks, 0.18) * rng.standard_normal(N)
    return soft + filtered(rattle, 3, [400.0, 2000.0], "band")


def murmurs():
    """Uneven grains keep the lower table modes murmuring, damped twice as fast as when knocked."""
    uneven = grains(per_s=390, spread_db=4.0)
    modes = np.zeros(N)
    for k, (hz, level_db, t60_s) in enumerate(TABLE_MODES[:9]):
        modes += from_db(level_db) * ring(np.roll(uneven, 991 * k), hz, t60_s / 2)
    dull = rms_one(filtered(modes, 2, 700.0))
    return from_db(swells(MURMURS, rise_s=0.019, sag_db_per_s=29.0, fall_db_per_s=198)) * dull


def squeaks():
    """Short gliding sines under a smooth swell."""
    out = np.zeros(N)
    for start, length, from_hz, to_hz, level_db in SQUEAKS:
        u = np.linspace(0, 1, int(length * SR))
        tone = np.sin(2 * np.pi * np.cumsum(from_hz + (to_hz - from_hz) * u) / SR)
        at = int(start * SR)
        out[at:at + len(u)] += from_db(level_db) * np.sin(np.pi * u) ** 0.96 * tone
    return out


def glass():
    """Skin slips on the glass in grains; once free, its rim modes sing along."""
    slips = grains(per_s=570, spread_db=3.5) + .9 * rng.standard_normal(N)
    rub = coloured(slips, RUB_COLOUR)
    rim = sum(from_db(level_db) * rms_one(ring(slips, hz, 1.0 / width_hz))
              for hz, level_db, width_hz in RIM_MODES)
    rub_db = swells(RUBS, rise_s=0.042, sag_db_per_s=19, fall_db_per_s=251.0)
    ring_db = swells(GLASS_RINGS, rise_s=0.089, sag_db_per_s=7, fall_db_per_s=251)
    return from_db(rub_db) * rub + from_db(ring_db) * rim


def room(x):
    """Diffuse echoes: noise that dies band by band, after a 4 ms gap."""
    t = np.arange(SR // 2) / SR
    white = rng.standard_normal(len(t)) * np.clip((t - .004) / 0.0033, 0, 1)
    tail = np.zeros(len(t))
    for hz, sos in bands(40):
        tail += signal.sosfilt(sos, white * from_db(-60 * t / at_hz(ROOM_T60, hz)))
    return signal.fftconvolve(x, tail / np.sqrt(np.sum(tail ** 2)))[:N]


def background():
    """Steady coloured noise as room tone, and a swelling narrow-band low rumble."""
    tone = coloured(rng.standard_normal(N), ROOM_TONE_COLOUR)
    rumble = rms_one(filtered(rng.standard_normal(N), 2, [52.0, 66.0], "band"))
    return from_db(ROOM_TONE_DB) * tone + from_db(in_time(RUMBLE, 1)) * rumble


def scene():
    """All sources direct, plus the room; the tin's ring beams forward and stirs the room less."""
    tin = tin_ring()
    ice = cube_cracks() + cube_rings() + clatter() + ticks() + thumps()
    rest = ice + table() + murmurs() + squeaks() + glass()
    echoes = from_db(ROOM_DB) * room(rest + from_db(-2.0) * tin)
    return (tin + rest + echoes + background())[None]


def record(dry):
    """Steep low-pass: 60 dB down from the stop edge upward."""
    return signal.sosfilt(signal.cheby2(14, 60, STOP_EDGE_HZ, fs=SR, output="sos"), dry)


dry = scene()
out = record(dry)
master(out)
```